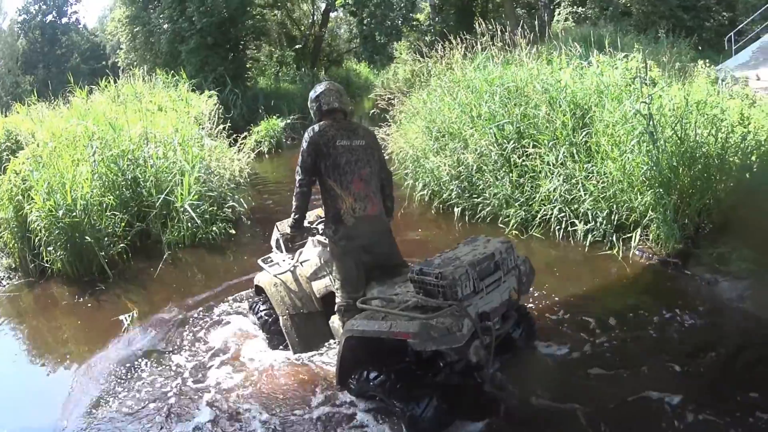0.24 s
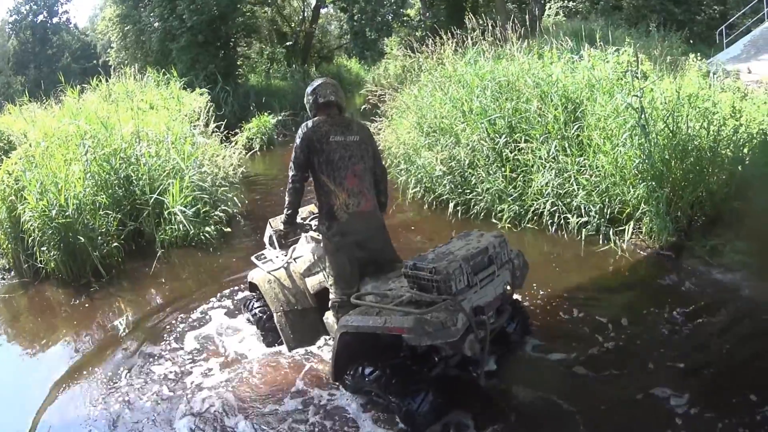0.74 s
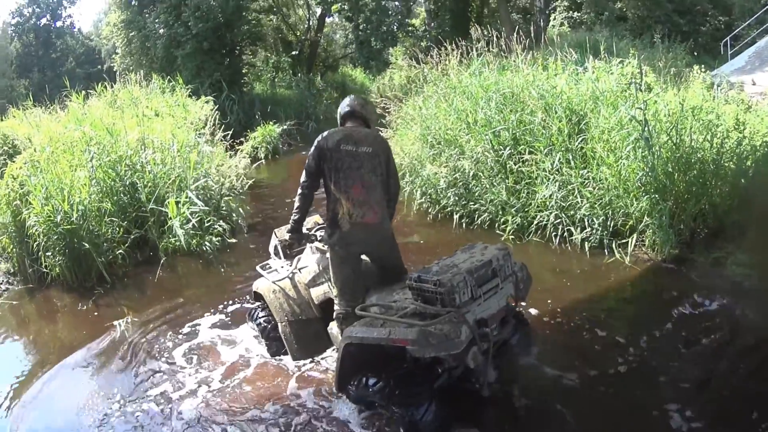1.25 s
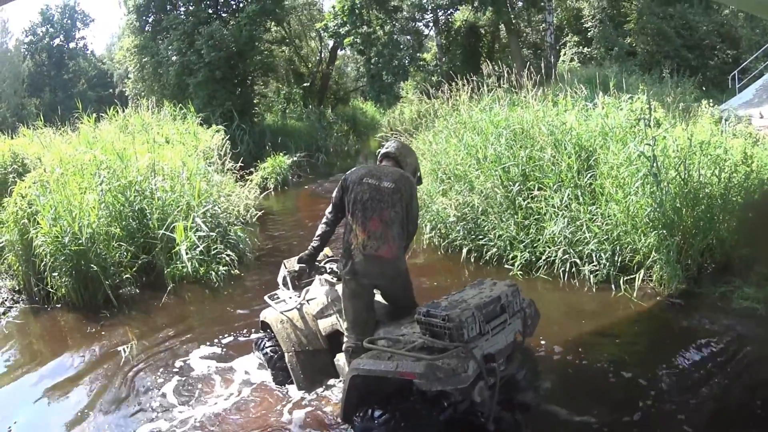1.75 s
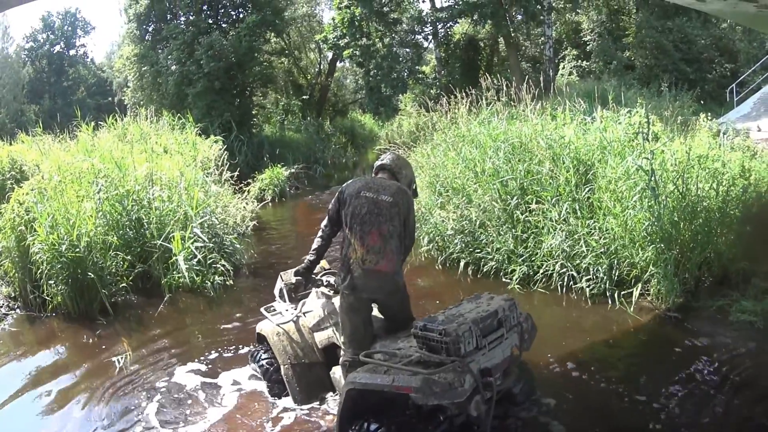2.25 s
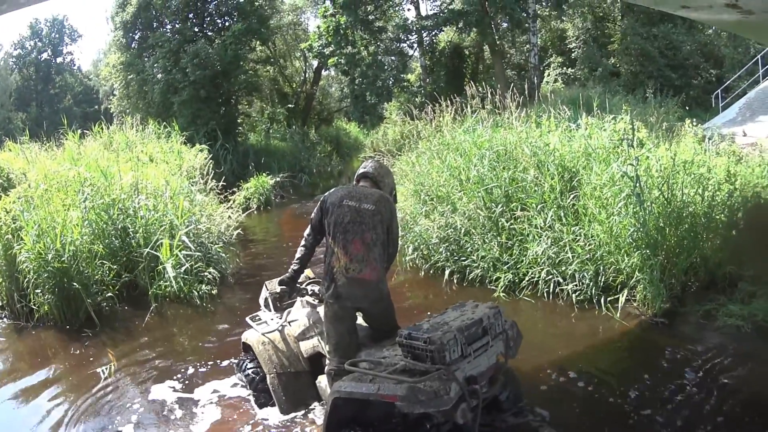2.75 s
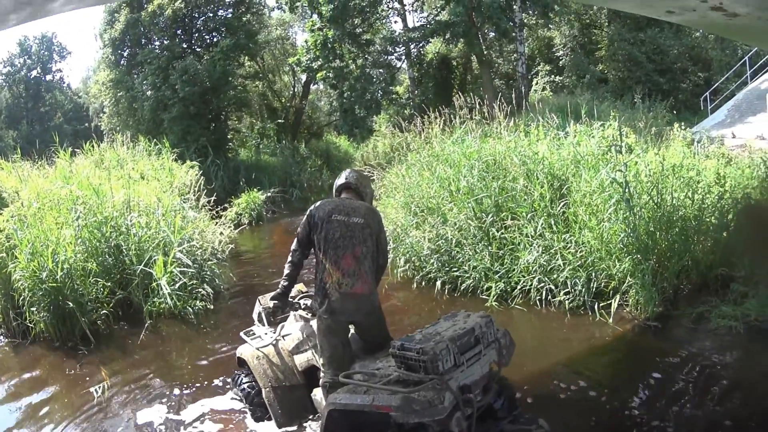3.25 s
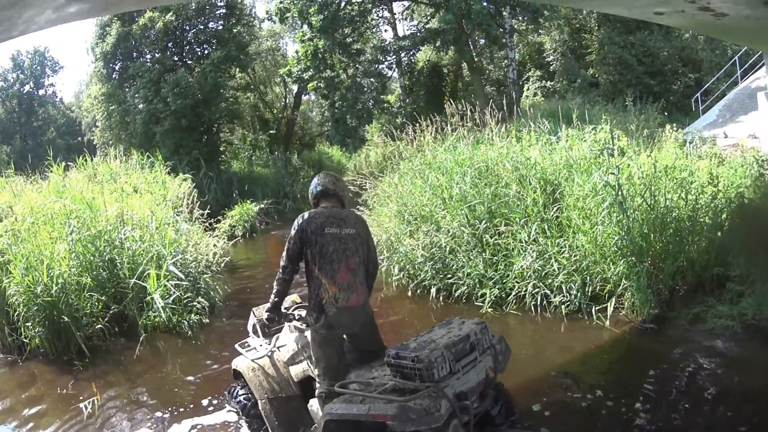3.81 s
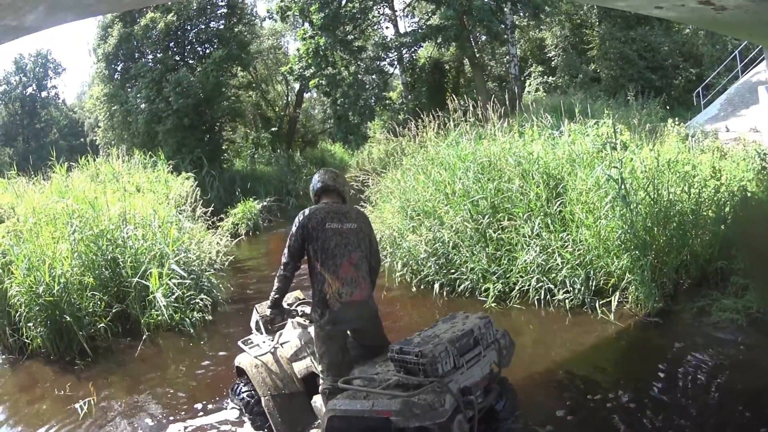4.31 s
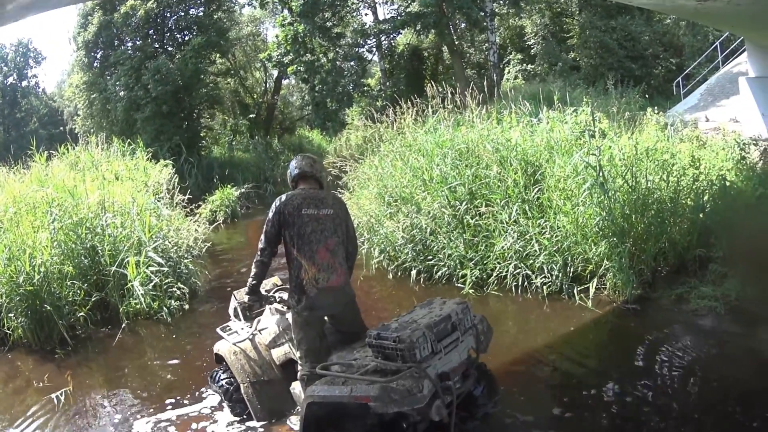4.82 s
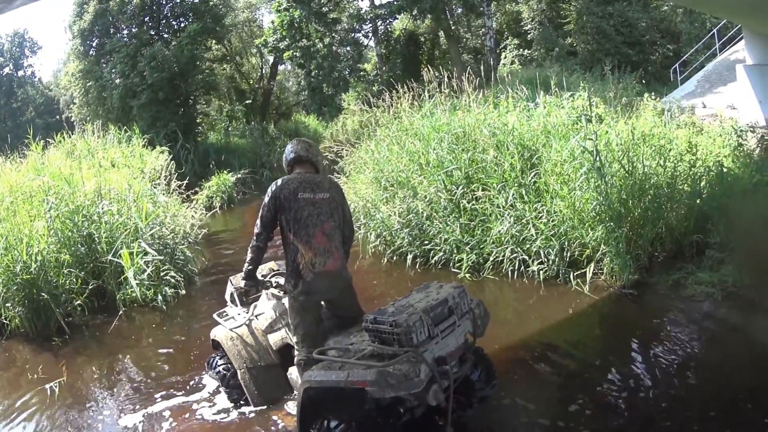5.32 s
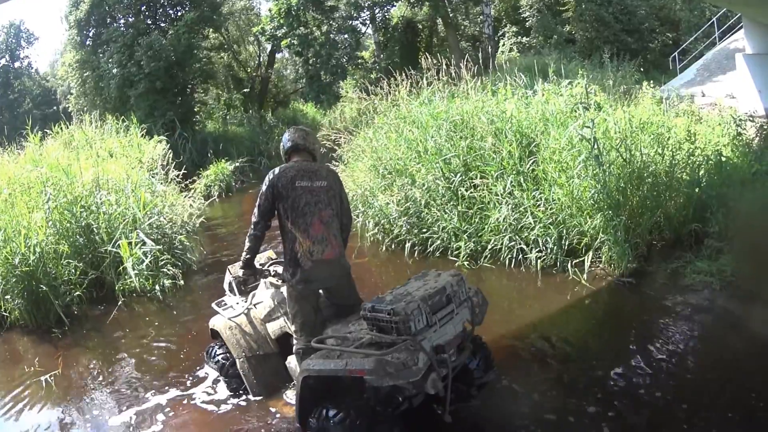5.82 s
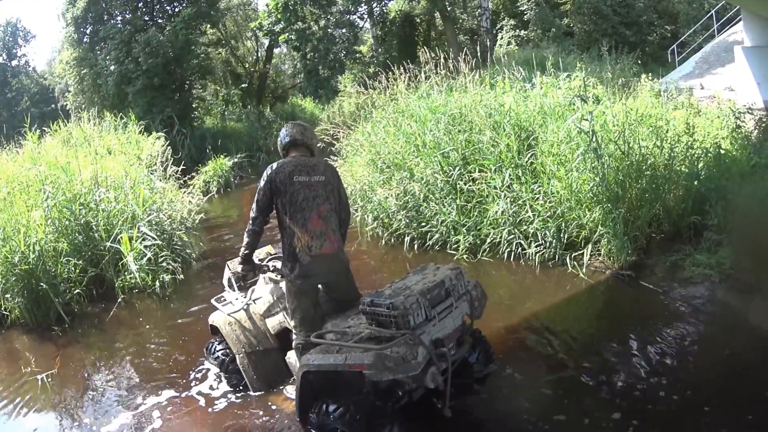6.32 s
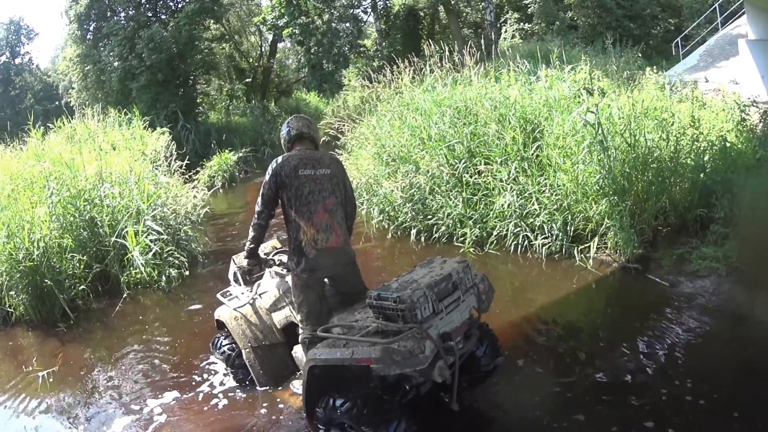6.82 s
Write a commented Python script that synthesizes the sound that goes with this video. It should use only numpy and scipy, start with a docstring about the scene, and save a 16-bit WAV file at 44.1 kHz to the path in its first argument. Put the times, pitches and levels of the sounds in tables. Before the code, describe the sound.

A rough, puttering idle begins slightly quick, sags within the first second, then hunts around a slow steady pace with occasional misfires and harder ticks. A second engine thumps along beneath it. A low hollow drone, thin fan whine and continuous bright hiss of moving water with tiny trickling droplets fill the background. Open-air handheld sound, fairly close, mostly centred, with limited deep bass and top treble.

```python
"""Two quad bikes idle side by side in a shallow stream: noise hisses, droplets chirp, sines make a fan whine.
Firing-fed rumble drones; exhaust thumps, puffs ringing at pipe pitches, drift in and out of step.
Noise bursts tick once a cycle on the nearer engine, which starts near 13 cycles/s, dips below 10
by 0.7 s, then hunts around 10.5; the farther engine stays near 10.5."""
import sys
import numpy as np
from scipy import signal
from scipy.io import wavfile
from scipy.ndimage import uniform_filter1d

SR = 44100
rng = np.random.default_rng(int(sys.argv[2]) if len(sys.argv) > 2 else 0)


def to_wav(sig):
    """Store sig (one row per channel, or 1-D mono) as 16-bit WAV at the path in sys.argv[1].

    Samples outside -1..1 are clipped; the rate is SR.
    """
    pcm = np.clip(np.atleast_2d(sig), -1, 1) * 32767
    pcm = np.round(pcm).astype(np.int16)
    wavfile.write(sys.argv[1], SR, pcm.T)  # frames by channels


N = 311346


def gain_of(db):
    """Decibels to an amplitude factor."""
    return 10 ** (np.asarray(db) / 20)


def evened(x):
    """Scales to rms 1."""
    return x / np.sqrt(np.mean(x ** 2) + 1e-20)


def read(points, hz):
    """Interpolates a table along log frequency."""
    f, value = np.transpose(points)
    return np.interp(np.log(hz + 1), np.log(f + 1), value)


def humps(rows, hz):
    """Sum of resonance-shaped humps and notches in dB."""
    return sum(db / (1 + (2 * (hz - f) / width) ** 2) for f, width, db in rows)


def noise(mid_db, side_db, patchy_db, size):
    """Stereo noise: a middle part alike at both ports, a side part opposite, in drifting patches."""
    hop = size // 4
    frames, hz = 4 * N // size + 5, np.fft.rfftfreq(size, 1 / SR)
    a, b, c, d, patches = rng.standard_normal((frames, len(hz), 5)).T
    # smooth over 8 bins, then 8 frames
    patches = uniform_filter1d(patches, 8, axis=0)
    patches = evened(uniform_filter1d(patches, 8, axis=1))
    mid = (a + 1j * b) * gain_of(mid_db(hz))[:, None]
    side = (c + 1j * d) * gain_of(side_db(hz))[:, None]
    spectrum = np.array([mid + side, mid - side]) * gain_of(patchy_db * patches)
    _, wave = signal.istft(spectrum, nperseg=size, noverlap=size - hop)
    return evened(wave[:, :N])


# middle and side hiss spectra, relative: (frequency [Hz], density [dB per Hz])
HISS_SPECTRUM = [(15, -46), (25, -18.5), (96, -2.5), (149, -5.5), (254, -9.5), (327, -13), (492, -16),
                 (930, -18), (1260, -7.5), (1510, -8), (1900, 0), (3590, -6), (4070, -9), (6780, -18.5),
                 (11000, -20), (14300, -51), (22000, -120)]
SIDE_SPECTRUM = [(15, -53), (25, -25), (197, -12), (798, -13.5), (954, -9), (1170, -12), (1430, -3.5),
                 (2100, -4.5), (2450, 0), (3080, -7.5), (4180, -6), (5530, -12.5), (6120, -11),
                 (10200, -13.5), (11000, -13.5), (14300, -47), (22000, -120)]
# resonances and notches in each: (centre [Hz], width at half the dB [Hz], height [dB])
HISS_HUMPS = [(93.5, 43, 2), (133, 18, -10.5), (655, 18, 12), (935, 22, -4), (1230, 34, 2), (1190, 27, -4),
              (1264, 47, 7), (1388, 36, 10.5), (1421, 26, -6), (1685, 60, 3.5), (1918, 63, 5),
              (1971, 56, -5), (2210, 450, 2), (2330, 14, 6.5), (2430, 80, 2), (2630, 91, 0.5),
              (2810, 98, -2), (3600, 95, -5.5), (3976, 210, 4), (4280, 220, 4.5), (4440, 170, -3),
              (5460, 750, 2.5), (6860, 380, -4), (7260, 150, 5.5), (8000, 480, -4.5), (9400, 260, 1.5)]
SIDE_HUMPS = [(950, 60, 3), (1330, 50, -1), (2000, 200, -3), (2450, 150, 2.5), (2700, 100, 6),
              (4200, 300, 1), (6200, 400, 4), (7200, 500, 1.5), (8200, 800, -3), (9800, 400, 2)]
# hiss level before the trim: (time [s], level [dB])
HISS_LEVEL = [(0, -35), (.7, -35.5), (1.5, -35.5), (2.5, -35.5), (7.06, -35.5)]
SIDE_TRIM_DB, HISS_TRIM_DB = -10, 1.0


def hiss():
    """Water and cooling air: smooth noise with fixed resonances."""
    def mid_db(hz):
        return read(HISS_SPECTRUM, hz) + humps(HISS_HUMPS, hz)

    def side_db(hz):
        return read(SIDE_SPECTRUM, hz) + humps(SIDE_HUMPS, hz) + SIDE_TRIM_DB

    wash = noise(mid_db, side_db, patchy_db=0.96, size=2048)
    time_s, level_db = np.transpose(HISS_LEVEL)
    level_db = np.interp(np.arange(N) / SR, time_s, level_db)
    return gain_of(level_db + HISS_TRIM_DB) * wash


SPLASH_DB, SPLASHES_PER_S, PITCHES = -45.5, 400, 24


def splashes():
    """Short rising droplet chirps, mostly small, scattered a little left and right."""
    out = np.zeros((2, N))
    for hz in np.geomspace(1300, 6500, num=PITCHES):
        t = np.arange(round(14 * SR / hz)) / SR  # 14 cycles
        bent_s = t + 0.082 * t ** 2 / t[-1]  # pitch climbs 16 %
        chirp = np.hanning(len(t)) * np.sin(2 * np.pi * hz * bent_s)
        size_db = 2.7 * np.minimum(rng.exponential(1, N), 4)
        lands = rng.random(N) < SPLASHES_PER_S / PITCHES / SR
        pan = rng.uniform(-0.47, 0.2, N)
        hits = gain_of(size_db) * lands * np.array([1 + pan, 1 - pan])
        colour_db = read(HISS_SPECTRUM, hz) + 10 * np.log10(hz / 2000)
        out += gain_of(colour_db) * signal.oaconvolve(hits, chirp[None])[:, :N]
    return gain_of(SPLASH_DB) * evened(out)


# fan tones: (multiple of blade rate, middle level [dB rms], side level [dB rms])
FAN_TONES = [(1, -64, -84), (2, -80, -73), (3, -76, -76), (6, -60, -72)]
BLADE_HZ = 487.7  # mean


def whine():
    """Multiples of the fan's blade rate, wavering a little in speed and level."""
    wander = rng.standard_normal((len(FAN_TONES) + 1, N))
    drift, *flutter = (evened(uniform_filter1d(x, SR // 8)) for x in wander)
    turns = np.cumsum(BLADE_HZ * (1 + .0005 * drift)) / SR
    out = np.zeros((2, N))
    for wobble, (multiple, mid_db, side_db) in zip(flutter, FAN_TONES):
        tone = np.sqrt(2) * gain_of(0.6 * wobble) * np.sin(2 * np.pi * round(multiple) * turns)
        out += (gain_of(mid_db) + gain_of(side_db) * np.array([[1], [-1]])) * tone
    return out


def resonate(x, hz, width):
    """A steep resonance: shift down to zero, smooth twice, shift back."""
    turn = np.exp(2j * np.pi * hz * np.arange(N) / SR)
    pole = np.exp(-np.pi * width / SR)
    low = signal.lfilter([1], [1, -pole], x / turn)
    low = signal.lfilter([1], [1, -pole], low)
    return evened((turn * low).real)


# silencer and frame resonances: (centre [Hz], width of each smoothing [Hz], level [dB rms])
DRONE_MODES = [(49, 14, -64), (81.2, 7.1, -68), (156, 18, -61), (197.2, 5.6, -57.5), (250.6, 9.6, -56),
               (275.4, 19, -62.5)]


def drone(impulses):
    """Silencer and frame: narrow resonances fed by steady rumble that swells after every firing."""
    t = np.arange(SR // 10) / SR
    swell = signal.oaconvolve(impulses, t * np.exp(-t / 0.014))[:N]
    rumble = (3.2 + evened(swell)) * rng.standard_normal((len(DRONE_MODES), N))
    return sum(gain_of(db) * resonate(x, hz, width) for x, (hz, width, db) in zip(rumble, DRONE_MODES))


def firings(speed, wait_cycles):
    """Times [s] at which the engine completes a cycle."""
    time_s, rate_hz = np.transpose(speed)
    cycles = np.cumsum(np.interp(np.arange(N) / SR, time_s, rate_hz)) / SR - wait_cycles
    return np.flatnonzero(np.diff(np.floor(cycles)) > 0) / SR


def strengths(times, usual_db, spread_db, odd_s, odd_db):
    """Firings scatter about the usual level; those nearest the odd times take their listed strength."""
    db = spread_db * rng.standard_normal(len(times))
    db[np.abs(times[:, None] - odd_s).argmin(axis=0)] = odd_db
    return usual_db + db


def train(times, db):
    """One impulse for each firing."""
    out = np.zeros(N)
    out[np.clip(np.round(times * SR).astype(int), 0, N - 1)] = gain_of(db)
    return out


def thumps(times, db, pipe):
    """Each exhaust puff swells and dies at the pitches of its pipe."""
    t, out = np.arange(SR // 5) / SR, np.zeros(N)
    for hz, mode_db, rise_s, lag_s in pipe:
        swell = (t / rise_s * np.exp(1 - t / rise_s)) ** 2
        puff = swell * np.sin(2 * np.pi * hz * t)
        out += signal.oaconvolve(train(times + lag_s, db + mode_db), puff)[:N]
    return out


THUMP_SPREAD_DB = 1.5
# farther engine's idle speed: (time [s], rate [firings/s])
FAR_SPEED = [(0.0, 10.82), (0.76, 10.32), (1.66, 10.29), (2.28, 10.57), (3.3, 10.21), (3.46, 10.58),
             (3.97, 10.1), (5.26, 10.76), (5.51, 10.41), (6.44, 10.4), (7.06, 9.58)]
# farther engine's hard and weak thumps: (time [s], level against usual [dB])
FAR_ODD = [(.03, 9), (.13, -12), (.32, 6.5), (.41, -5), (.5, -7), (.6, -8), (.79, -3), (.89, -2), (.99, 6),
           (1.18, 4), (2.15, 6), (2.53, -6), (2.72, -5), (3.4, 5), (3.88, 4), (4.66, 2.5), (4.85, 4.5),
           (5.41, 3), (6.57, -8), (6.66, 3), (6.76, -7)]
FAR_WAIT_CYCLES, FAR_THUMP_DB = .378, -46


def far_engine():
    """Firing times and thump levels from the farther engine's wandering idle."""
    times = firings(FAR_SPEED, FAR_WAIT_CYCLES)
    return times, strengths(times, FAR_THUMP_DB, THUMP_SPREAD_DB, *np.transpose(FAR_ODD))


# farther pipe's modes: (pitch [Hz], level [dB], rise [s], lag behind firing [s])
FAR_PIPE = [(103, 1, .016, -.0053), (196, -6, .02, -.0017), (250, -8, .011, .0021)]


def far_exhaust(times, db):
    """The farther pipe rings at three pitches with each puff."""
    return thumps(times, db, FAR_PIPE)


# nearer engine's idle speed, hunting as it settles: (time [s], rate [firings/s])
NEAR_SPEED = [(0.0, 13.06), (0.13, 12.65), (0.67, 9.35), (1.19, 10.72), (1.27, 10.23), (1.71, 10.01),
              (2.05, 10.76), (2.28, 10.66), (2.61, 9.76), (2.96, 10.88), (3.13, 10.13), (4.05, 10.68),
              (4.08, 11.3), (4.34, 9.74), (4.48, 10.49), (5.23, 9.93), (5.5, 10.78), (5.79, 9.97),
              (6.12, 10.53), (6.49, 10.64), (6.58, 10.55), (7.06, 10.67)]
# misfires and hard knocks: (time [s], tick against usual [dB], thump against usual [dB])
NEAR_ODD = [(.04, 5, -17), (.12, -1, -14), (.29, -2, -15), (.37, -5, 2), (.56, -8, -17), (.77, -15, -15),
            (.88, 3, 3.5), (1.46, -14, -15), (1.56, 2, -1), (1.66, -15, -20), (1.95, 2.5, 0),
            (2.14, 6, -10), (2.23, 0, 6), (2.62, 2, -13), (2.82, -1, 3), (3.3, -12, -6), (3.49, -15, -15),
            (4.15, -6, -2), (4.35, -5, -2), (4.54, -20, -2), (4.73, -3, 0), (5.13, 3, 1.5), (5.42, 7, 0),
            (5.52, 6.5, 1), (5.61, 3.5, 2), (5.71, -9, -6), (5.91, -9, -4), (6.1, 2, -6), (6.38, 5.5, -1),
            (6.67, 4, 2), (6.76, -10, -9), (6.86, 3, 1), (6.95, -16, -15)]
NEAR_WAIT_CYCLES, NEAR_THUMP_DB = .576, -44.5
TICK_DB, TICK_SPREAD_DB = -39, 0


def near_engine():
    """Firing times, tick and thump levels from the nearer engine's hunting idle."""
    times = firings(NEAR_SPEED, NEAR_WAIT_CYCLES)
    odd_s, odd_tick_db, odd_thump_db = np.transpose(NEAR_ODD)
    tick_db = strengths(times, TICK_DB, TICK_SPREAD_DB, odd_s, odd_tick_db)
    thump_db = strengths(times, NEAR_THUMP_DB, THUMP_SPREAD_DB, odd_s, odd_thump_db)
    return times, tick_db, thump_db


# nearer pipe's modes, the lowest two beating, 196 Hz ringing early and again later, 250 Hz once, late:
# (pitch [Hz], level [dB], rise [s], lag behind firing [s])
NEAR_PIPE = [(84, -5, .03, -.0104), (103, -5, .026, -.0054), (196, -9, .010, -.0111),
             (196, -10, .012, .0095), (250, -15, .022, .0161)]


def near_exhaust(times, db):
    """The nearer pipe's two close low modes beat with each puff."""
    return thumps(times, db, NEAR_PIPE)


# clatter after each firing: (delay [s], level [dB], decay [s])
CLATTER = [(0, 4.5, 0.0044), (0.0035, 0, 0.003), (0.03, -0.5, 0.011), (0.0016, -5, 0.052)]
# tick spectrum, relative: (frequency [Hz], density [dB per Hz])
TICK_SPECTRUM = [(1500, -32), (2500, -20), (4000, 7), (4800, 1.5), (5400, 4), (6500, -4.5), (7400, 0.5),
                 (7900, -0.5), (8600, -0.5), (9200, -2.5), (9900, 3), (11200, -2)]
TICK_LEAD_S, TICK_TRIM_DB = .003, -2.5


def ticks(times, db):
    """A sharp valve tick, a bounce, the second cylinder's chuff and a fading rattle shape noise."""
    t, power = np.arange(SR // 8) / SR, np.zeros(N)
    for delay_s, part_db, decay_s in CLATTER:
        spread_db = 3 * rng.standard_normal(len(times)) * (delay_s > 0)
        # later parts follow the tick's strength only in part
        follow = 1 if delay_s == 0 else .4
        size_db = db.mean() + follow * (db - db.mean()) + part_db + spread_db
        fade = (1 - np.exp(-t / 0.0019)) * np.exp(-t / decay_s)
        fade_power = (fade / fade.max()) ** 2
        hits = train(times + delay_s - TICK_LEAD_S, size_db)
        power += signal.oaconvolve(hits ** 2, fade_power)[:N]
    rattle = noise(lambda hz: read(TICK_SPECTRUM, hz), lambda hz: read(TICK_SPECTRUM, hz) - 9,
                   patchy_db=2.6, size=256)
    return gain_of(TICK_TRIM_DB) * np.sqrt(np.abs(power)) * rattle


def scene():
    """Sums all sources; thumps and drone reach both ports alike."""
    near_s, tick_db, near_db = near_engine()
    far_s, far_db = far_engine()
    low = near_exhaust(near_s, near_db) + far_exhaust(far_s, far_db)
    low = low + drone(train(near_s, near_db) + train(far_s, far_db))
    return low + ticks(near_s, tick_db) + hiss() + splashes() + whine()


BASS_HZ, EDGE_HZ = 38, 11030


def record(dry):
    """The microphone's bass roll-off, then a steep treble limit."""
    thin = signal.sosfilt(signal.butter(2, BASS_HZ, "high", fs=SR, output="sos"), dry)
    limit = signal.firwin(2047, EDGE_HZ, window=("kaiser", 9), fs=SR)
    return signal.oaconvolve(thin, limit[None], "same")


dry = scene()
out = record(dry)
to_wav(out)
```